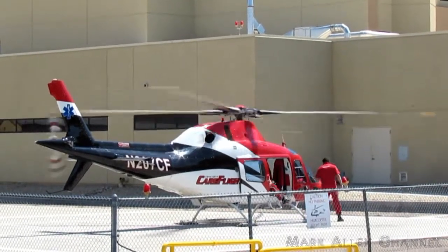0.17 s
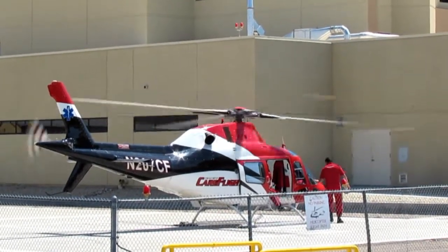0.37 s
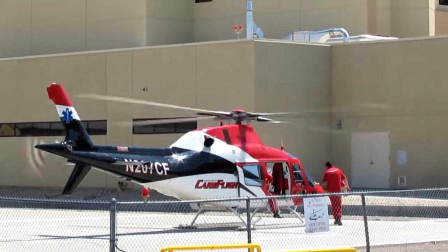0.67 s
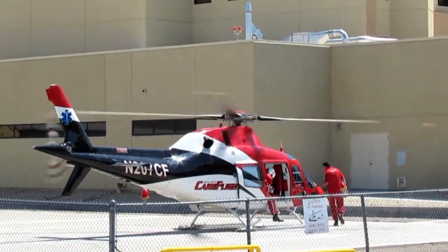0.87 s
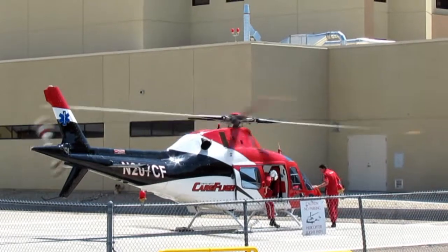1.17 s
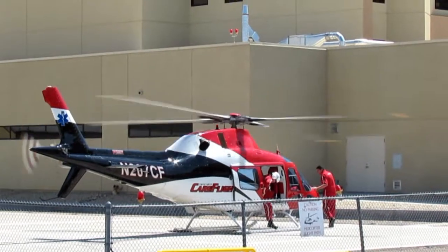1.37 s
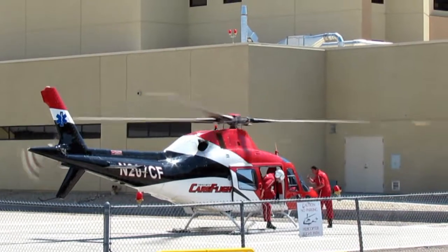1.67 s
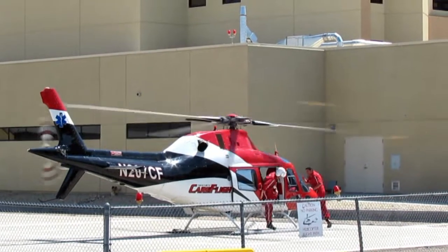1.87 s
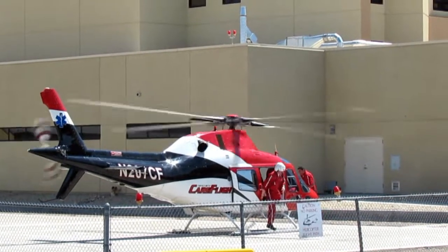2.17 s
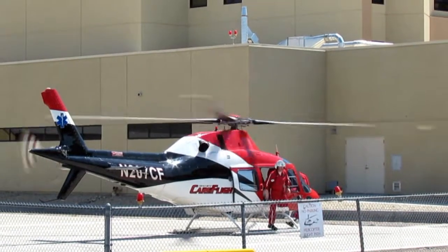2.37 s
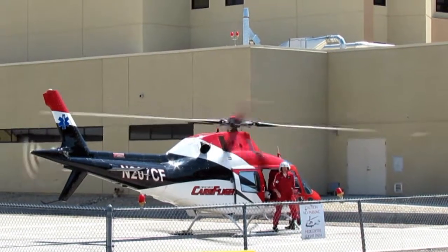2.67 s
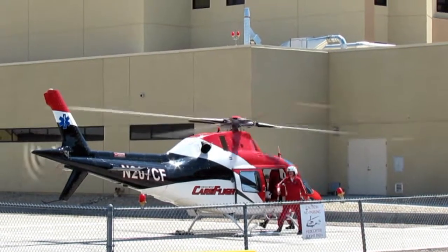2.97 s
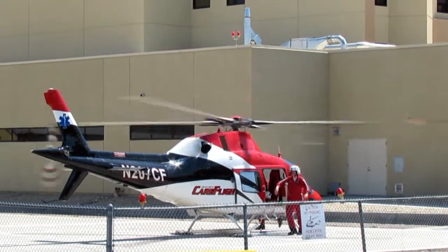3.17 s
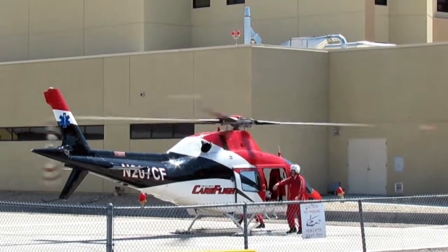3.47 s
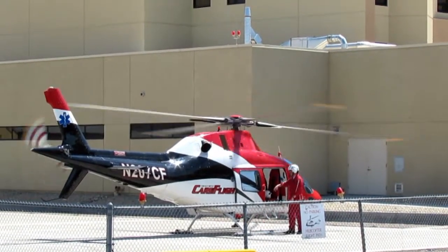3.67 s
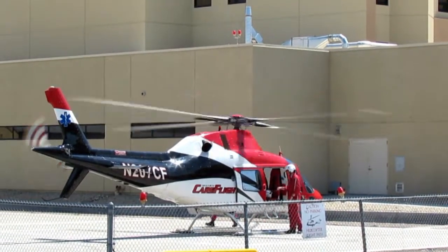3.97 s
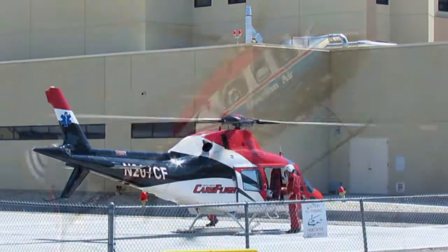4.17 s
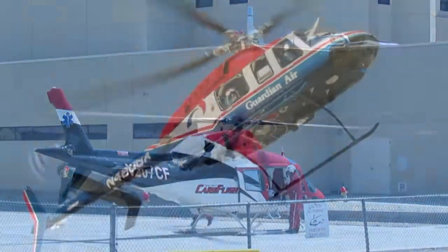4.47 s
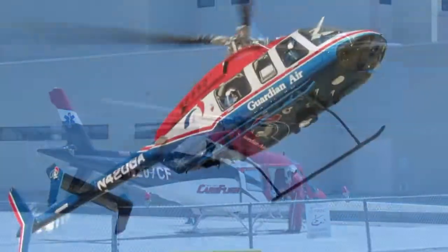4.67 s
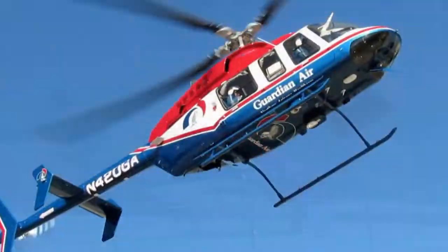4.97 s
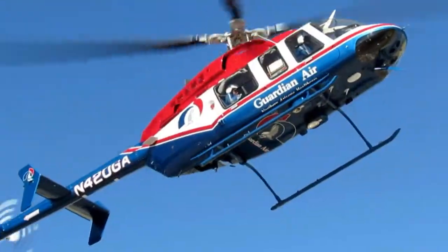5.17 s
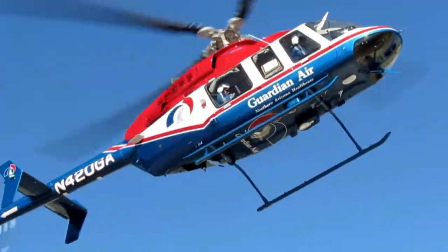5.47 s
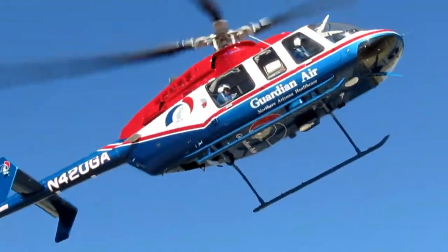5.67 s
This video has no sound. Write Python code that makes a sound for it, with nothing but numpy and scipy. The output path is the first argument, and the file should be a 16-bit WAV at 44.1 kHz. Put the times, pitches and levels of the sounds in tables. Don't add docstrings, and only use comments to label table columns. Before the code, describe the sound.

A helicopter idles with wavering turbine whine and hiss in rumbling wind, cutting suddenly to rapid heavy blade slaps of another hovering close by.

```python
import sys
import numpy as np
from scipy import signal
from scipy.fft import rfft, irfft
from scipy.io import wavfile
from scipy.ndimage import uniform_filter1d

SR = 44100
rng = np.random.default_rng(int(sys.argv[2]) if len(sys.argv) > 2 else 0)


def volts_from_db(level):
    exponent = np.asarray(level, float) / 20
    return 10 ** exponent


def int16_out(signal):
    q = np.round(np.clip(np.atleast_2d(signal).T, -1, 1) * 32767)
    wavfile.write(sys.argv[1], SR, q.astype(np.int16))


N = 256662
T = np.arange(N) / SR
HZ = np.arange(N // 2 + 1) * SR / N + 1e-3

CUT_S = 4.1043
BLADE_HZ, FIRST_BLADE_S = 27.94, 4.1040


def unit(x):
    return x / np.sqrt(np.mean(x ** 2))


def curves(table):
    s, *columns = np.transpose(table)
    return [np.interp(T, s, column) for column in columns]


def over_hz(table, hz):
    table_hz, value = np.transpose(table)
    return np.interp(np.log(hz), np.log(table_hz), value)


def bell(center_s, half_s):
    return np.exp(-((T - center_s) / half_s) ** 2)


def swells(table):
    return sum(db * bell(s, half_s) for s, db, half_s in table)


def walk(rate):
    hold = int(SR / rate)
    steps = np.repeat(rng.standard_normal(N // hold + 1), hold)
    smooth = uniform_filter1d(uniform_filter1d(steps, hold), hold)
    return unit(smooth[:N])


def shaped(x, gain):
    return irfft(rfft(x) * gain, N)


def pair(like):
    mid, side = rng.standard_normal((2, N))
    like = np.clip(like, -1, 1)
    mid = shaped(mid, np.sqrt(1 + like))
    side = shaped(side, np.sqrt(1 - like))
    return np.array([mid + side, mid - side]) / 2


def panned(x, pan_db):
    return x * volts_from_db(np.array([[.5], [-.5]]) * pan_db)


def bands(noise, colour, pan, move):
    spectrum = rfft(noise) * panned(volts_from_db(over_hz(colour, HZ)), over_hz(pan, HZ))
    spectrum = spectrum / np.sqrt(np.mean(irfft(spectrum.mean(axis=0), N) ** 2))
    place = 2 * np.log2(HZ / 125)
    out = 0
    for k in range(15):
        band = irfft(spectrum * np.clip(1 - abs(place - k), 0, 1), N)
        out = out + move(125 * 2 ** (k / 2)) * band
    return out


def resonance(hz, width_hz, like):
    return unit(shaped(pair(like), 1 / (1 + ((HZ - hz) / width_hz) ** 2)))


def evened(x, hold_s, share):
    power = uniform_filter1d(x ** 2, int(hold_s * SR), axis=-1)
    return unit(x / power ** (np.clip(share, 0, 1) / 2))


def wind():
    # time in seconds, level in dB.
    gust = [(0.0, -43), (0.37, -40.5), (0.74, -40.5), (1.1, -41), (1.47, -42), (1.84, -43), (2.21, -42.5),
            (2.58, -40.5), (2.95, -39.5), (3.31, -39), (3.68, -37.5), (4.05, -39.5), (4.3, -34), (5.0, -38),
            (5.8, -50)]
    # time in seconds, left rise in dB, right rise in dB, half length in seconds.
    buffet = [(0.11, 18, 1, 0.0057), (0.126, 1, 9, 0.011), (0.195, 9, 9, 0.016), (0.46, 9, 3, 0.011),
              (0.497, 12, 7, 0.0095), (0.599, 11.5, 8, 0.021), (0.643, 14.5, 3.2, 0.013),
              (0.753, 9, 4, 0.016), (0.864, 9, 1, 0.014), (0.987, 5, 14.5, 0.0075), (1.076, 9.5, 5, 0.008),
              (1.245, -7, 10, 0.022), (1.319, 6, 14.5, 0.0073), (1.412, 12.5, 8, 0.023),
              (1.822, -2, 10.5, 0.011), (1.872, 6, 6, 0.0098), (1.919, 12.5, 3.5, 0.01),
              (2.1, 10, -5, 0.02), (2.211, 15, 6, 0.014), (2.279, 11.5, 5.6, 0.014),
              (2.315, 10.5, 9, 0.015), (2.575, 8, 6, 0.018), (2.637, -3, 6, 0.02), (2.698, 5, 5, 0.012),
              (2.964, 2, 7, 0.0049), (3.29, 9, 0, 0.0095), (3.321, 11.5, -4, 0.008), (3.503, 8, 2, 0.03),
              (3.689, 17, 9, 0.0032), (4.024, 10, -1, 0.0087)]
    # time in seconds, rise in dB, half length in seconds.
    lull = [
        (0.042, -2.5, 0.06),
        (1.558, -7, 0.01),
        (1.684, -8, 0.02),
        (1.84, -5, .012),
        (1.97, -5, 0.036),
        (2.447, -5, 0.012),
        (2.774, -6.5, 0.07),
        (3.096, -9, 0.013),
        (3.785, -9, 0.031),
    ]
    # pitch in Hz, level in dB per Hz.
    colour = [(10, -22), (20, -17), (50, -1.5), (110, 1.5), (170, 0), (300, -4.5), (500, -8.5),
              (800, -22.5), (1500, -44)]
    gust_db = curves(gust)[0] + np.array([1.64 * walk(45), 2.2 * walk(45)]) - 0.8
    for s, left_db, right_db, half_s in buffet:
        gust_db = gust_db + np.array([[left_db], [right_db]]) * bell(s, half_s)
    gust_db = gust_db + swells(lull)
    rumble = shaped(rng.standard_normal((2, N)), volts_from_db(over_hz(colour, HZ)))
    rumble = evened(rumble, 0.0234, 0.49)
    dull = shaped(rumble, 1 / (1 + (HZ / 1200.0) ** 2))
    bright = rumble - dull
    ports = dull * volts_from_db(gust_db) + bright * volts_from_db(gust_db + 0.23 * (gust_db + 16.5))
    return ports - 0.37 * ports[::-1]


def air():
    # time in seconds, level in dB.
    carry = [(0, 2.5), (.18, 0.5), (.4, 2.5), (.58, 4), (.7, -0.5), (.82, 0), (1.05, -1.5), (1.33, -1),
             (1.55, -2), (1.75, -2.5), (1.95, -1.5), (2.2, -1), (2.45, -0.5), (2.7, 0), (2.95, 2.5),
             (3.3, 2), (3.55, 2), (4.05, -0.5)]
    # time in seconds, rise in dB, half length in seconds.
    tone_swells = [(.02, 16.5, 0.15), (.31, 15.5, 0.092), (.59, 13.5, 0.1), (.85, 5, 0.2),
                   (1.6, 10.5, 0.15), (1.85, 4, 0.078), (2.2, 5, 0.11), (2.49, 12.5, 0.075),
                   (2.82, 8.5, .07), (2.98, 10.5, 0.088), (3.6, 9, 0.082), (3.9, 4, 0.26)]
    # time in seconds, rise in dB, half length in seconds.
    low_swells = [
        (.08, 4.3, 0.09),
        (.45, 6.3, 0.18),
        (.85, 11.3, 0.16),
        (1.4, 4.8, 0.22),
        (2.38, 5.2, 0.15),
        (2.92, 11.5, 0.32),
        (3.55, 7.1, 0.29),
        (3.9, 1.7, 0.048),
        (1.92, 3, 0.063),
    ]
    # time in seconds, rise in dB, half length in seconds.
    high_swells = [
        (.1, 3, 0.12),
        (.24, -10, 0.035),
        (.65, 2, .06),
        (1.36, -15, 0.11),
        (1.76, -6, 0.051),
        (1.9, 3.5, 0.091),
        (2.6, 5, 0.069),
        (3.15, -1, 0.11),
        (3.97, 0.5, .12),
    ]
    # time in seconds, rise in dB, half length in seconds.
    box_swells = [
        (.82, 8, 0.11),
        (1.33, -12, 0.064),
        (1.65, 7.5, 0.29),
        (2.45, 6, 0.087),
        (3.5, 3.5, 0.12),
    ]
    carry_db, = curves(carry)
    tone_swell_db = swells(tone_swells)
    low_db = -62 + swells(low_swells)
    high_db = -54.5 + carry_db + swells(high_swells)
    box_db = -54.5 + 2.4 * carry_db + swells(box_swells)
    exhaust_db = -60.5 + carry_db + 4.5 * np.exp(-T / 0.23)
    return tone_swell_db, low_db, high_db, box_db, exhaust_db


def exhaust_hiss(exhaust_db, low_db):
    # pitch in Hz, level in dB per Hz.
    colour = [(300, -54), (700, -3.5), (1100, 3), (1600, -4.5), (2300, 3), (2900, 1.5), (3500, -5),
              (4200, -7.5), (5200, -6), (6800, -7), (8000, -13), (11500, -20.5), (12600, -31), (13500, -33),
              (15000, -40)]
    # pitch in Hz, difference in dB.
    pan = [(60, 0.0), (110, 1.0), (200, 3), (380, 29), (700, -0.5), (1290, -2.5), (2380, -5.5), (4400, 2),
           (8120, 5), (15000, -22)]
    # pitch in Hz, likeness (1 = the same).
    likeness = [(700, 1), (1400, 0.79), (3100, 0.64), (6800, 0.56), (15000, 0.34)]
    swish = np.cos(2 * np.pi * 17.27 * T + np.pi)

    def move(f):
        high = np.clip(np.log2(f / 2800.0), 0, 1)
        level_db = exhaust_db + 0.32 * (1 - high) * (low_db - exhaust_db - 8.5) + 11.5
        return volts_from_db(level_db + high * swish + 0.61 * walk(2.5) + 1.66 * walk(15))

    hiss = bands(pair(over_hz(likeness, HZ)), colour, pan, move)
    flutter_db = 2.5 * np.cos(2 * np.pi * 20.0 * T + np.pi)
    return hiss + resonance(6660.0, 160., 0.6) * volts_from_db(exhaust_db - 6.0 + flutter_db)


def blade_tips():
    # time in seconds, level in dB.
    passes = [(.215, -58), (.9, -67), (1.65, -69), (1.88, -67), (2.04, -66), (2.513, -59), (2.63, -65),
              (2.735, -66), (2.965, -56), (3.15, -68), (3.2, -58), (3.325, -68), (3.43, -74), (3.63, -55),
              (3.66, -63)]
    out, noise = np.zeros((2, N)), resonance(0, 350., 0.66)
    for s, db in passes:
        t = T - s
        chirp = np.sin(2 * np.pi * (9700 - 30000 * t) * t)
        out = out + volts_from_db(db) * bell(s, 0.015) * chirp * noise
    return out


def gear_whines(low_db, high_db, box_db):
    # pitch in Hz, width in Hz, left minus right in dB, level in dB.
    gear_lines = [
        (2082, 52, -5, 0),
        (2346, 52, -5, .5),
        (2590, 28, -3, -10),
        (3310, 70, .4, -8),
        (3420, 520, .4, -4.5),
        (3550, 60, .4, -11),
    ]
    levels_db = low_db, high_db, high_db, box_db, box_db, box_db
    out = 0
    for (hz, width_hz, pan_db, db), level_db in zip(gear_lines, levels_db):
        whine = evened(resonance(hz, width_hz / 2, 0.74), 0.046, .5)
        out = out + panned(whine, pan_db) * volts_from_db(level_db + db)
    return out


def turbine(swell_db):
    turbine_hz = 6082
    turn = 2 * np.pi * np.cumsum(turbine_hz + 3.68 * walk(40.55)) / SR
    tone = np.array([volts_from_db(db + 2.2 * walk(34.74)) * np.sin(turn + .5 * walk(8)) for db in (5.5, -1.5)])
    tone = tone * volts_from_db(swell_db - 60)
    skirt = panned(resonance(turbine_hz, 43.0, 0.41), 14.0) * volts_from_db(.5 * swell_db - 65)
    octave = np.array([volts_from_db(db + 0.55 * swell_db + 2.2 * walk(29.9)) * np.sin(2 * turn + 0.39 * walk(8))
                       for db in (-75, -72)])
    octave_skirt = resonance(2 * turbine_hz, 70., .6) * volts_from_db(-79 + .3 * swell_db)
    return tone + skirt + octave + octave_skirt


def idling():
    tone_swell_db, low_db, high_db, box_db, exhaust_db = air()
    hiss = exhaust_hiss(exhaust_db, low_db)
    return hiss + blade_tips() + gear_whines(low_db, high_db, box_db) + turbine(tone_swell_db)


def attitude():
    turned = .5 + .5 * np.tanh((T - 5.23) / 0.205)
    thump_db = -28 - 3.4 * turned - 4.9 * np.exp(-abs(T - CUT_S) / 0.024)
    roar_db = -24.5 + 0.11 * turned
    treble_db = -37 + 1.7 * turned + 4.1 * np.exp(-abs(T - CUT_S) / 0.028)
    whistle_hz = 14765 - 138 * turned
    whistle_db = -60 + 7.3 * (T - CUT_S)
    snap_db = -17.5 + 2.8 * turned
    return thump_db, roar_db, treble_db, whistle_hz, whistle_db, snap_db


def thin_whistle(whistle_hz, whistle_db):
    turn = 2 * np.pi * np.cumsum(whistle_hz) / SR
    pulse_db = 3 * np.cos(2 * np.pi * BLADE_HZ * (T - FIRST_BLADE_S) - .6)
    noise = resonance(0, 95., .6) * np.sin(turn) + resonance(0, 95., .6) * np.cos(turn)
    return volts_from_db(whistle_db + pulse_db) * noise


def tail_rotor(tail_turn):
    # multiple of the tail blade rate, level in dB.
    multiples = [(2, -41), (3, -38), (4, -33), (5, -41), (6, -47), (7, -45), (8, -49)]
    buzz = sum(volts_from_db(db + 2.2 * walk(8)) * np.cos(k * tail_turn) for k, db in multiples)
    click = np.exp(52 * (np.cos(tail_turn) - 1)) * volts_from_db(-20 + 5.2 * walk(70))
    return buzz + shaped(click, 1 / (1 + (640.0 / HZ) ** 4))


def blade_roar(blades, chance, tail_turn, roar_db, treble_db):
    # pitch in Hz, level in dB per Hz.
    colour = [(90, -48), (170, 0), (390, -4.5), (610, 0.5), (760, -7), (980, -3), (1150, -9), (2300, -10.5),
              (3100, -16.5), (4800, -25), (8100, -22.5), (10000, -28), (11900, -25.5), (14000, -29.5)]
    # pitch in Hz, difference in dB.
    pan = [(60, 1.5), (110, -3), (200, 1), (380, 0), (700, -0.5), (1290, -1.0), (2380, -3), (4400, 3.5),
           (8120, 3.0), (15000, -3.5)]
    # pitch in Hz, likeness (1 = the same).
    likeness = [(60, 0.75), (130, 1), (290, 0.88), (640, 0.87), (1410, 0.72), (3100, 0.26), (6820, 0.28),
                (15000, 0.67)]
    cracks = np.zeros(N + 8 * SR)
    at = blades[:, None] + abs(.0046 + .0032 * chance[:, 2:12])
    cracks[(at * SR).astype(int)] = 6.4 * np.tanh(2.9 * chance[:, 12:22])
    cracks = shaped(cracks[:N], 1 / (1 + (HZ / 12400.0) ** 2) / (1 + (550.0 / HZ) ** 2))
    passed = (T - FIRST_BLADE_S) * BLADE_HZ
    since = passed % 1 / BLADE_HZ
    blade = np.clip(passed.astype(int) + 1, 0, len(blades) - 1)
    size = volts_from_db(chance[blade, 1])
    chop = np.exp(6.4 * (np.cos(tail_turn) - 1))

    def move(f):
        high = np.clip(np.log2(f / 2900.0), 0, 1)
        delay_s = 0.0005 + 0.0028 * np.clip(np.log2(f / 4200.0), 0, 1)
        burst = np.where(since < delay_s, since / delay_s, np.exp(-(since - delay_s) / 0.0087))
        depth = np.exp(-(np.log2(f / 740.0) / 7.9) ** 2)
        chop_depth = 0.33 * np.exp(-(np.log2(f / 1800.0) / 1.8) ** 2)
        level_db = (1 - high) * (roar_db - 3.5) + high * (treble_db + 10.0)
        return volts_from_db(level_db + 0.79 * walk(20)) * (1 + depth * size * burst + chop_depth * chop)

    noise = pair(over_hz(likeness, HZ)) + cracks * np.array([[1.1], [.9]])
    return bands(noise, colour, pan, move)


def vortex_snaps(blades, chance, snap_db):
    hits = np.zeros(N + 8 * SR)
    at = blades + .0004 + .00025 * chance[:, 22]
    hits[(at * SR).astype(int)] = volts_from_db(2.5 * chance[:, 23])
    t = T[:SR // 25]
    dips = -t / 0.0015 * np.exp(1 - t / 0.00085) * (np.sin(2 * np.pi * 690 * t - 1.6) + 0.21)
    return signal.fftconvolve(hits, dips)[:N] * volts_from_db(snap_db)


def blade_thumps(blades, chance, thump_db):
    hits = np.zeros(N + 8 * SR)
    hits[((blades + .0003 * chance[:, 0]) * SR).astype(int)] = volts_from_db(1.05 * chance[:, 1])
    t = T[:SR // 25]
    ring = -t / .0045 * np.exp(-t / .0045) * np.sin(2 * np.pi * 124 * t)
    push = 0.17 * np.exp(-((t - .006) / 0.0003) ** 2)
    thump = signal.fftconvolve(hits, ring + push)[:N]
    thump = shaped(thump, .55 + .45 / (1 + (92 / HZ) ** 8))
    return thump / np.std(thump[T > CUT_S]) * volts_from_db(thump_db + np.array([[.7], [-.7]]) - 0.2)


def hovering():
    thump_db, roar_db, treble_db, whistle_hz, whistle_db, snap_db = attitude()
    count = int(N / SR * BLADE_HZ)
    blades = FIRST_BLADE_S + (np.arange(count) - 1) / BLADE_HZ
    chance = rng.standard_normal((count, 24))
    tail_hz, tail_blade_s = 84.6, 4.1998
    tail_turn = 2 * np.pi * tail_hz * (T - tail_blade_s) + 0.05 * walk(4)
    air_noise = thin_whistle(whistle_hz, whistle_db) + blade_roar(blades, chance, tail_turn, roar_db, treble_db)
    slaps = vortex_snaps(blades, chance, snap_db) + blade_thumps(blades, chance, thump_db)
    return air_noise + tail_rotor(tail_turn) + slaps


def scene():
    after = np.clip((T - CUT_S) * SR / 8, 0, 1)
    settle = volts_from_db(4.5 * np.exp(-np.clip(T - CUT_S, 0, 9) / 0.04))
    return wind() + idling() * (1 - after) + hovering() * after * settle


def roll_off(x):
    return signal.sosfilt(signal.butter(12, 16870, fs=SR, output="sos"), x)


def record(dry):
    x = signal.sosfilt(signal.butter(1, 15, "high", fs=SR, output="sos"), dry)
    x = np.tanh(1.5 * x) / 1.5
    x = signal.sosfilt(signal.ellip(12, .3, 75, 15760, fs=SR, output="sos"), x)
    return roll_off(x)


dry = scene()
out = record(dry)
int16_out(out)
```